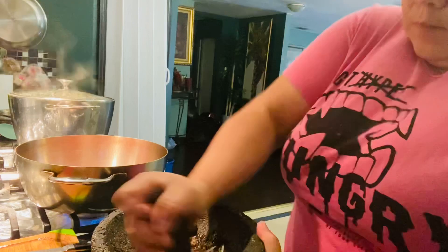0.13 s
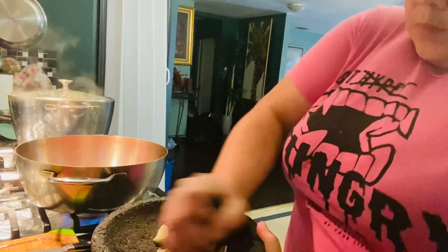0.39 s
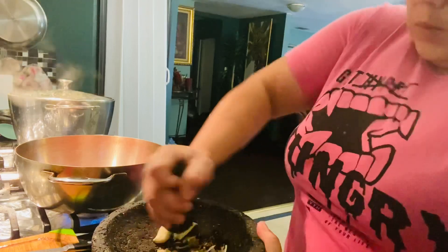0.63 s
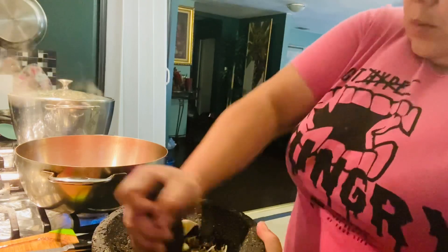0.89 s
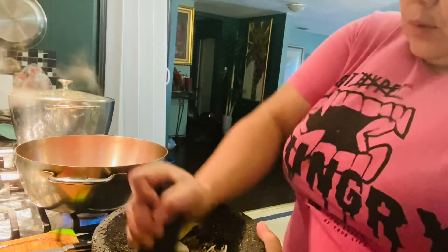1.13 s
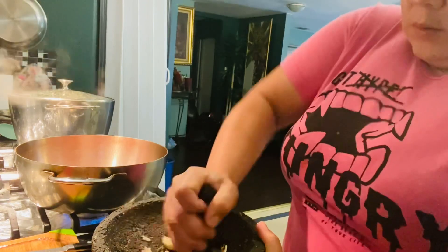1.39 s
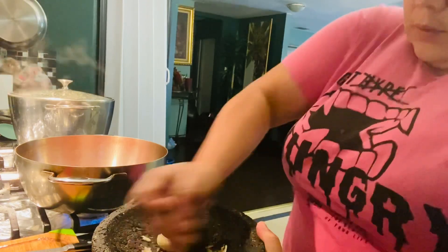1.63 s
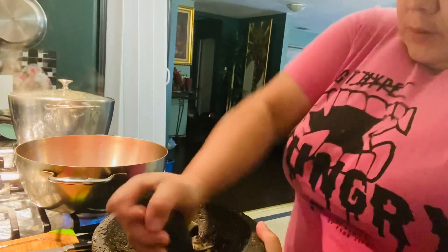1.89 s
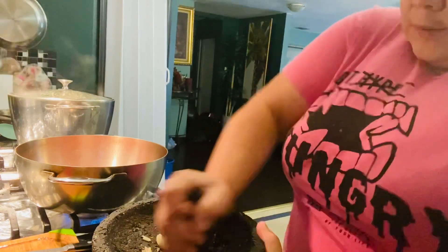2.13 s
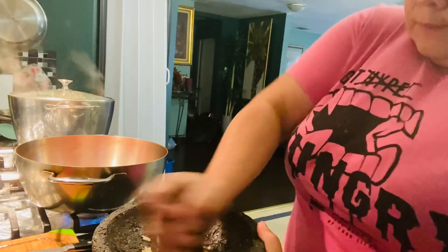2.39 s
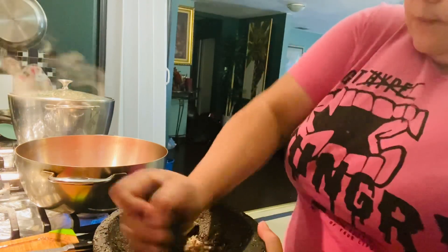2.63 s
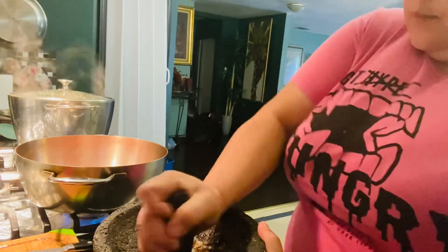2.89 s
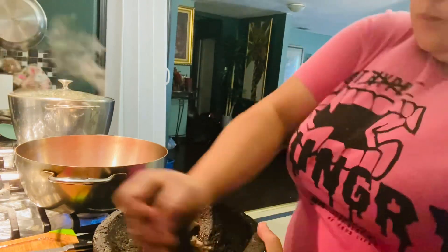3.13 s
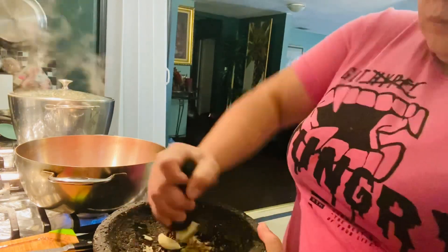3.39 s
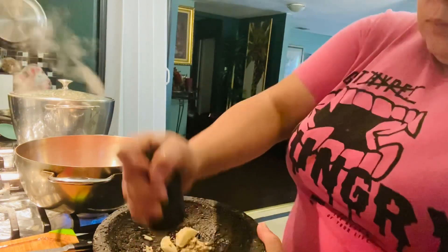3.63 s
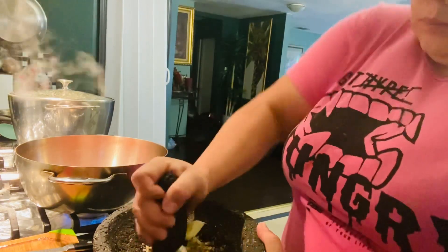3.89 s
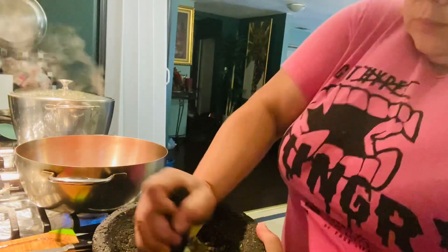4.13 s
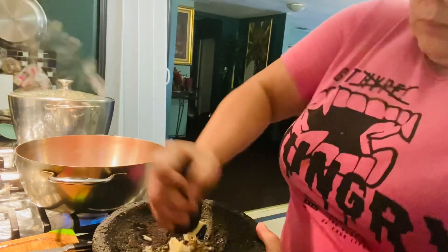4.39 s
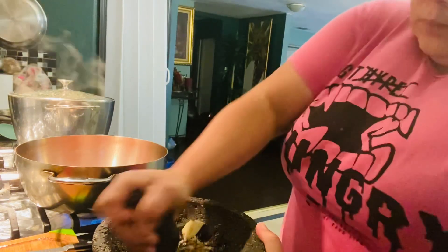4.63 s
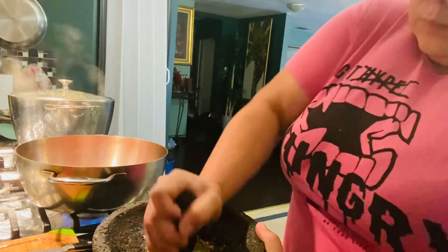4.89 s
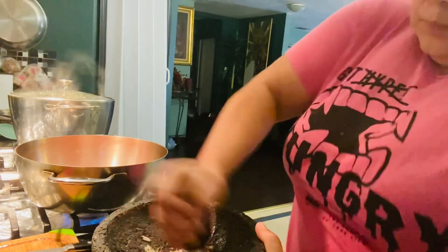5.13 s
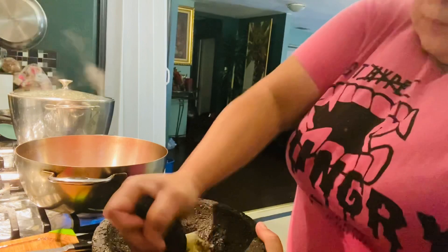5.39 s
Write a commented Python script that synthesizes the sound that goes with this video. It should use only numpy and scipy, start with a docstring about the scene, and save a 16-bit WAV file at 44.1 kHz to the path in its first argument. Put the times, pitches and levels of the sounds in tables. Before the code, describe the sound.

A stone pestle knocks and grinds garlic in a stone mortar, irregular hard clacks and gritty scrapes over a quietly hissing, steaming pot.

```python
"""From the start a simmering pot hisses, louder to the left: shaped noise whose treble swells in spurts.
At once a stone pestle pounds and grinds in a stone mortar: bursts of grit slips ring bowl and wall modes.
Hard clacks add the highest modes, the hollow counter thuds under each push, and a small room answers.
The hardest blows fall near 0.76, 2.29, 3.39 and 4.44 s; just after each the treble of the hiss dips.
Two microphone ports a hand apart hear it all."""
import sys
import numpy as np
from scipy import signal
from scipy.fft import rfft, irfft, next_fast_len
from scipy.io import wavfile
from scipy.ndimage import uniform_filter1d

SR = 44100
rng = np.random.default_rng(int(sys.argv[2]) if len(sys.argv) > 2 else 0)


def materialize(psi):
    """Save the field psi as 16-bit PCM at rate SR to the path in sys.argv[1].

    A 1-D psi becomes a single channel; in a 2-D psi each row is a channel.
    """
    bounded = np.clip(np.atleast_2d(psi).T, -1, 1)
    quanta = np.round(bounded * 32767).astype(np.int16)
    wavfile.write(sys.argv[1], SR, quanta)


def to_linear_factor(level_db):
    """Convert decibel levels (scalar or array-like) to linear amplitude factors."""
    exponent = np.asarray(level_db, float) / 20
    return 10 ** exponent


N = 242991  # length in samples, about 5.5 s

# Colour of the steam hiss. Each row: frequency in Hz, relative spectrum level in dB.
HISS_COLOUR = [(18, -54), (30, -24.5), (93, 3.5), (194, -27.5), (324, -3.5), (645, -3), (785, -2.5),
               (888, -7.5), (979, -2), (1810, -8), (2000, -7), (2810, -5.5), (4490, -7), (8080, -7),
               (10600, -34.5), (13800, -48.5), (22000, -120)]
# Faint narrow peaks in the hiss. Each row: centre in Hz, half width in Hz, boost in dB.
HISS_PEAKS = [(2300, 40, 5.5), (2838, 19, 9.5), (3310, 69, 4)]
# Stereo lean of the hiss. Each row: frequency in Hz, left over right in dB.
HISS_BALANCE = [(60, -1.5), (89, 7), (130, -0.5), (200, 14.5), (290, 11), (430, -2.5), (640, 3.0),
                (950, 10.5), (1410, 7.5), (2090, 11.5), (3100, 10), (4610, 16), (6830, 9), (10100, 17)]
# Steam spurts in the treble of the hiss. Each row: peak in seconds, swell in dB, half width in ms.
SPURTS = [(.12, 2.5, 120), (.74, 3, 27), (2.06, 2.5, 12), (4.719, 6.5, 11), (5.231, 8, 6.6)]
# Treble drops just after the hardest blows. Each row: time in seconds, depth in dB.
DIPS = [(.775, 3.5), (2.3, 2.5), (3.395, 4), (4.455, 12)]
# Pestle contacts. Each row: nominal middle in seconds, bowl level in dB, length in ms,
# wall ring over bowl tone in dB before the wall trim, bowl tone best struck in Hz.
CONTACTS = [(.019, -15, 16.5, -2, 477), (0.057, -23, 55, -4, 420), (0.102, -26, 32, -6.5, 425),
            (0.182, -21.5, 12.5, -15, 464), (0.218, -28.5, 41, -31, 498), (.316, -25.5, 17, -5, 590),
            (.355, -29, 57, 1.5, 447), (.635, -10.5, 10.2, -11, 420), (0.723, -34, 25, -5, 383),
            (.761, -7.5, 16.6, -6, 526), (1.073, -35.5, 61, -26, 375), (1.134, -11, 25.8, -7, 482),
            (1.195, -30.5, 20, -21, 368), (1.261, -13.5, 19, -10, 417), (1.317, -32, 67, -21, 458),
            (1.4, -20, 20, -13, 553), (1.422, -25.5, 34, -5, 470), (1.457, -22, 49, -9, 318),
            (1.756, -20, 26.5, -19, 583), (1.794, -28, 37, -10, 466), (1.927, -25.5, 62, -12, 485),
            (1.889, -29, 21, -14, 460), (1.981, -34, 9, -16, 486), (2.038, -29.5, 41, -14, 463),
            (2.07, -25.5, 49, -3.5, 514), (2.165, -39, 82, -10, 504), (2.292, -6.5, 10, -10.5, 503),
            (2.356, -16, 41, -11, 435), (2.441, -15.5, 20, -14.5, 465), (2.517, -15, 46.5, -19.5, 363),
            (2.592, -25, 25, -7, 570), (2.655, -25, 30, -3, 408), (2.692, -25, 64, -16, 310),
            (2.795, -21, 33, -14.5, 363), (2.847, -23.5, 61, -26.5, 352), (2.956, -23, 60, -19, 385),
            (3.08, -29, 35, -10, 420), (3.109, -18.5, 9.1, -24.5, 478), (3.391, -9, 13, -10.5, 450),
            (3.795, -36.5, 61, -23, 429), (3.919, -34.5, 44, -18, 418), (4.056, -15.5, 20, -26, 420),
            (4.08, -26.5, 28, -11, 456), (4.137, -23, 2.3, -36, 390), (4.419, -17, 14.3, -14, 456),
            (4.446, -7.5, 9.1, -10.5, 452), (4.731, -37, 70, -9, 465), (4.867, -25, 28, -14, 337),
            (4.938, -26, 24, -12, 360), (5.171, -33.5, 56, -35, 454), (5.24, -20.5, 14, -5.5, 388),
            (5.258, -21, 14.7, -13, 520), (5.293, -19.5, 27.4, -8.5, 384), (5.465, -27, 19, -9.5, 483)]
# Hard clacks of bare stone on stone. Each row: nominal time in seconds, rim level in dB and
# wall level in dB, both before their trims.
CLACKS = [(.014, -30, -35), (.309, -48, -25), (.338, -39, -20.5), (.629, -37.5, -50), (.755, -20, -19.5),
          (1.126, -27.5, -24), (1.256, -41, -20.5), (1.394, -48, -22), (1.75, -42, -23),
          (1.903, -48, -26.5), (2.285, -21, -16.5), (2.337, -28.5, -12), (2.436, -44.5, -35),
          (2.506, -37, -23), (2.587, -38.5, -36), (2.782, -49, -41), (3.103, -41.5, -28.5),
          (3.387, -25.5, -9.5), (4.053, -35, -38), (4.437, -17.5, -11), (4.883, -35.5, -29),
          (5.24, -47, -34.5), (5.292, -41, -49)]
# Modes of the mortar: 8 of the bowl, 7 of the wall, the rest of the rim. Each row: pitch in Hz,
# free t60 in seconds, left level in dB, right level in dB, left phase lead in radians.
MORTAR_MODES = [(219.4, 0.1, -4, -6.5, 2.5), (300, 0.11, -3, -7, 2.5), (328.5, 0.065, -9.5, -6, 2),
                (375, 0.045, -2, 5.5, 0.95), (420, 0.037, 2.5, 2.5, 1.5), (465, 0.076, -5, -1, 2),
                (486.6, 0.082, -10.5, -6.5, 2.5), (580.7, 0.045, -5, 0.5, 1.5), (703, 0.071, 2, -5.5, 4),
                (892, 0.081, -2, -1.5, 4), (970, 0.019, 5.5, -8.5, 3.5), (1106, 0.022, -2.5, -6.5, 3.5),
                (1313, 0.023, -22.5, -14, 0.5), (1510, 0.0088, 0, -11.5, -0.5),
                (1773, 0.054, -11.5, -20.5, 1), (2220, 0.021, -2, -17, 0.5), (2518, 0.034, -1, -8.5, 1.5),
                (3220, 0.0065, -12, -25, 0.5), (4350, .006, -10.5, -24, -2.5),
                (5800, 0.0058, -8, -29.5, -0.5), (7400, .004, -16.5, -32, 4.5)]
# Full-arm pushes into the counter. Each row: nominal peak in seconds, level in dB, length in ms,
# counter tone best struck in Hz.
THUDS = [(0.225, -25.5, 55, 136), (.318, -29, 14, 151), (.367, -32, 35, 153), (0.722, -24, 17, 129),
         (0.763, -17, 17, 148), (1.059, -22.5, 16, 133), (1.112, -23.5, 15, 149), (1.302, -24.5, 23, 124),
         (1.697, -25.5, 11.4, 118), (1.958, -27, 25, 138), (2.026, -28.5, 17, 154), (2.079, -30, 31, 167),
         (2.295, -23.5, 18, 145), (2.342, -19, 29, 166), (2.699, -27, 97, 178), (2.85, -28, 46, 171),
         (3.38, -15, 18.6, 107), (3.793, -18, 12.5, 112), (4.061, -16.5, 35, 153), (4.206, -30.5, 27, 85),
         (4.427, -8.5, 6, 116), (4.727, -31.5, 18, 159), (4.905, -30.5, 65, 167), (5.156, -24.5, 16, 124),
         (5.25, -20, 17, 139), (5.305, -29.5, 63, 132), (5.472, -27.5, 13, 140)]
# Modes of the counter. Each row: pitch in Hz, t60 in seconds, left level in dB, right level in dB,
# left phase lead in radians.
COUNTER_MODES = [(72, 0.15, 9.5, -6, 0.83), (89, 0.18, -3, -9, 1), (114.1, 0.043, 9.5, 10.5, 0.59),
                 (141.2, 0.05, 2.5, 6, 0.22), (179.8, 0.045, 1, 0.5, 0.88)]
# Decay of the room. Each row: frequency in Hz, t60 in seconds.
ROOM_DECAY = [(100, 0.4), (400, 0.47), (1000, 0.45), (3000, 0.13), (8000, 0.39)]
# How much of the mortar is sent to the room. Each row: frequency in Hz, send level in dB.
ROOM_SEND = [(300, -17.5), (500, -23.0), (900, -8), (1500, -11.5), (2600, -4), (4500, -28.5)]


def unit(x):
    """Scaled to rms 1."""
    return x / np.sqrt(np.mean(x ** 2) + 1e-20)


def along(points, hz):
    """Reads a curve of (Hz, value) points on a log frequency axis."""
    f, v = np.transpose(points)
    return np.interp(np.log(hz + 1), np.log(f + 1), v)


def filtered(x, response):
    """Shapes x by a complex response of frequency."""
    m = next_fast_len(N + 8192)
    hz = np.fft.rfftfreq(m, 1 / SR)
    return irfft(rfft(x, m) * response(hz), m)[..., :N]


def treble_db():
    """Treble gain of the hiss: spurts swell smoothly; dips fall at once, hold, then let go."""
    t = np.arange(N) / SR
    gain_db = np.zeros(N)
    for s, db, ms in SPURTS:
        gain_db += db * np.exp(-(1000 * (t - s) / ms) ** 2 / 2)
    for s, db in DIPS:
        # 4 ms of onset; deeper dips last longer
        span_s = np.where(t < s, .004, .06 + .009 * db)
        gain_db -= db * np.exp(-np.abs((t - s) / span_s) ** 3)
    return gain_db


def pot():
    """Steam hiss reaches the right port first but mostly weaker; part is diffuse, and its treble moves."""
    level_db = -41.5  # rms before the treble moves
    alike = 0.35  # share of power common to both ports
    # three noises share one slowly changing patchwork of loud and soft spots
    z = signal.stft(rng.standard_normal((3, N)), nperseg=512)[2]
    patches = uniform_filter1d(rng.standard_normal(z.shape[1:]), size=4, axis=0)
    patches = unit(uniform_filter1d(patches, size=8, axis=1))
    direct, *diffuse = signal.istft(z * to_linear_factor(1.7 * patches), nperseg=512)[1][:, :N]
    arrivals = np.array([np.roll(direct, shift=21), direct])  # left lags by 21 samples
    pair = np.sqrt(alike) * arrivals + np.sqrt(1 - alike) * np.array(diffuse)

    def colour(hz):
        peaks_db = sum(db / (1 + ((hz - centre) / width) ** 2) for centre, width, db in HISS_PEAKS)
        port_share = 1 / np.sqrt(1 + to_linear_factor(np.outer([-2, 2], along(HISS_BALANCE, hz))))
        return to_linear_factor(along(HISS_COLOUR, hz) + peaks_db) * port_share

    hiss = unit(filtered(pair, colour))
    treble = filtered(hiss, lambda hz: 1 / (1 + (2600 / (hz + 1)) ** 6))
    return to_linear_factor(level_db) * (hiss + treble * (to_linear_factor(treble_db()) - 1))


def near(modes, struck_hz, db_per_octave):
    """The modes as struck at one spot: those far from its tone answer less."""
    modes = np.array(modes, float)
    modes[:, 2:4] -= db_per_octave * np.abs(np.log2(modes[:, :1] / struck_hz))
    return modes


def held(modes, longest_s):
    """The modes under a hand on the mortar, which stops any longer ring."""
    return [(hz, min(t60, longest_s), *rest) for hz, t60, *rest in modes]


def ringing(modes, burst, scatter_db, detune):
    """Stereo answer of modes to one tap; grip and load shift strengths, pitches and phases each time."""
    hz, t60, left_db, right_db, lead = np.transpose(modes)[..., None]
    t = np.arange(round(SR * t60.max())) / SR
    chance = rng.standard_normal((3, *hz.shape))
    hz = hz * (1 + detune * chance[1])
    # burst power around each mode, divided out so that the mode levels hold for any burst
    bins = np.fft.rfftfreq(8192, 1 / SR)[:900]
    overlap = 1 / (1 + ((bins - hz) * t60) ** 2)
    drive = overlap @ np.abs(rfft(burst, 8192)[:900]) ** 2 / overlap.sum(1)
    soft_start = (1 - np.exp(-t * hz / 0.65)) ** 3  # the contact yields for a part of a cycle
    decay = np.exp(-np.log(1000) * t / t60)
    fade = soft_start * decay * to_linear_factor(scatter_db * chance[0]) / np.sqrt(drive[:, None] + 1e-12)
    phase = 2 * np.pi * hz * t
    left = fade * to_linear_factor(left_db) * np.sin(phase + lead + 0.41 * chance[2])
    right = fade * to_linear_factor(right_db) * np.sin(phase)
    return np.array([np.sum(left, 0), np.sum(right, 0)])


def add(out, s, db, rise_ms, fall_ms, modes, slips_per_s, detune):
    """A burst of uneven slips, pressed hardest at time s, rings the modes; db sets its strength."""
    grit_db = 4.5  # spread of slip sizes: a few coarse grains tick out of the rub
    lead_in = SR // 16
    ms = 1000 * np.arange(-lead_in, SR // 10) / SR
    side_ms = np.where(ms < 0, max(rise_ms, 2), max(fall_ms, 2))
    pressure = np.exp(-np.abs(ms / side_ms) ** 3)
    slips = rng.random(len(ms)) < slips_per_s / SR
    burst = pressure * rng.standard_normal(len(ms)) * slips
    burst *= to_linear_factor(grit_db * rng.standard_normal(len(ms)))
    first, last = np.flatnonzero(pressure > 1e-3)[[0, -1]]
    burst = burst[first:last]
    answer = ringing(modes, burst, scatter_db=2.0, detune=detune)
    sound = signal.fftconvolve(burst[None], answer, axes=1)
    # level counts over the pressed time plus 5 ms
    samples = np.sum(pressure ** 2) + SR / 200
    start = round(s * SR) + SR - lead_in + first  # out has a second of room ahead
    out[:, start:start + sound.shape[1]] += to_linear_factor(db) * sound * np.sqrt(2 * samples / np.sum(sound ** 2))


def pestle():
    """Contacts ring the bowl and, more briefly, the wall; only hard clacks reach the highest modes."""
    wall_trim_db = -2.5
    out = np.zeros((2, N + 2 * SR))
    bowl = held(MORTAR_MODES[:8], longest_s=.06)
    wall = held(MORTAR_MODES[8:15], longest_s=.03)
    rim = MORTAR_MODES[15:]
    for s, db, ms, wall_db, tone_hz in CONTACTS:
        struck_bowl = near(bowl, tone_hz, db_per_octave=23.5)
        add(out, s - .004, db, ms / 2, ms / 2, struck_bowl, slips_per_s=3600, detune=0.026)
        add(out, s - .003, db + wall_db + wall_trim_db, 0.62 * ms, 0.54 * ms, wall,
            slips_per_s=2000, detune=0.057)
    for s, rim_db, wall_db in CLACKS:
        add(out, s + 0.002147, rim_db - 7.5, 2.2, 3.5, rim, slips_per_s=11000, detune=0.0042)
        add(out, s + 0.002186, wall_db - 6.0, 2.2, 3.5, wall, slips_per_s=4100, detune=0.014)
    return out[:, SR:SR + N]


def counter():
    """The mortar's foot passes each push on to the hollow counter top, which rings its low modes."""
    out = np.zeros((2, N + 2 * SR))
    # a contact with no push within 20 ms leans a little: softer, longer, on one tone
    leans = []
    for s, db, ms, *_ in CONTACTS:
        if min(abs(s - thud[0]) for thud in THUDS) > 1 / 50:
            leans.append((s, db - 16.5, ms + 25, 164.1))
    for s, db, ms, tone_hz in THUDS + leans:
        struck_top = near(COUNTER_MODES, tone_hz, db_per_octave=34.5)
        add(out, s - .009, db, 0.49 * ms, 0.61 * ms, struck_top, slips_per_s=3300, detune=0.017)
    return out[:, SR:SR + N]


def kitchen(x):
    """Each frequency of the room dies at its own speed; every quarter second of sound gets a fresh tail."""
    out, step = np.zeros((2, N + SR)), SR // 4
    delay = 300  # samples before the room answers
    for start in range(0, N, step):
        hz, t, z = signal.stft(rng.standard_normal((2, SR // 2)), SR, nperseg=256)
        decay_db = -60 * t / along(ROOM_DECAY, hz)[:, None]
        tail = signal.istft(z * to_linear_factor(decay_db), SR, nperseg=256)[1]
        tail = tail / np.linalg.norm(tail[0])
        wet = signal.fftconvolve(x[:, start:start + step], tail, axes=1)
        out[:, start + delay:start + delay + wet.shape[1]] += wet
    return out[:, :N]


def scene():
    """The pot under mortar and counter with their room sound; small bodies radiate little deep bass."""
    hiss = pot()
    knocks, thuds = pestle(), counter()
    knocks_to_room = filtered(knocks, lambda hz: to_linear_factor(along(ROOM_SEND, hz)))
    room = kitchen(knocks_to_room + to_linear_factor(-11.0) * thuds)
    struck = knocks + thuds + room
    # two gentle low cuts at 60 Hz in a row
    return filtered(struck, lambda hz: (1j * hz / (60 + 1j * hz)) ** 2) + hiss


def roll_off(x):
    """The treble ends steeply here."""
    return signal.sosfilt(signal.butter(12, 10740, fs=SR, output="sos"), x)


def record(dry):
    """Peaks round off smoothly below a ceiling of 0.93."""
    rounded = dry / (1 + np.abs(dry / 0.93) ** 6) ** (1 / 6)
    return roll_off(rounded)


dry = scene()
out = record(dry)
materialize(out)
```